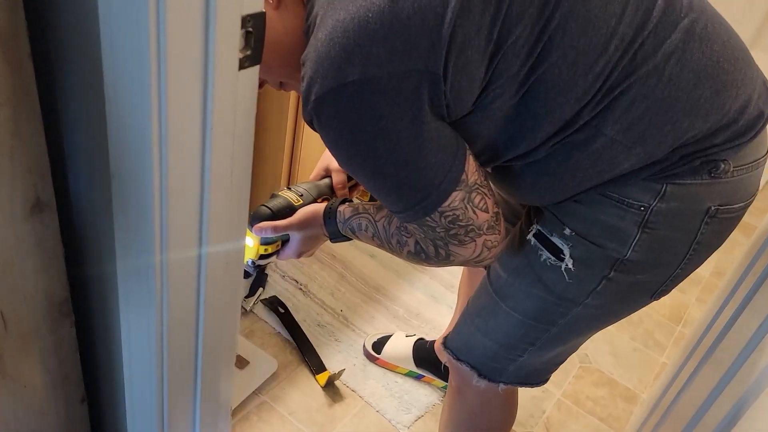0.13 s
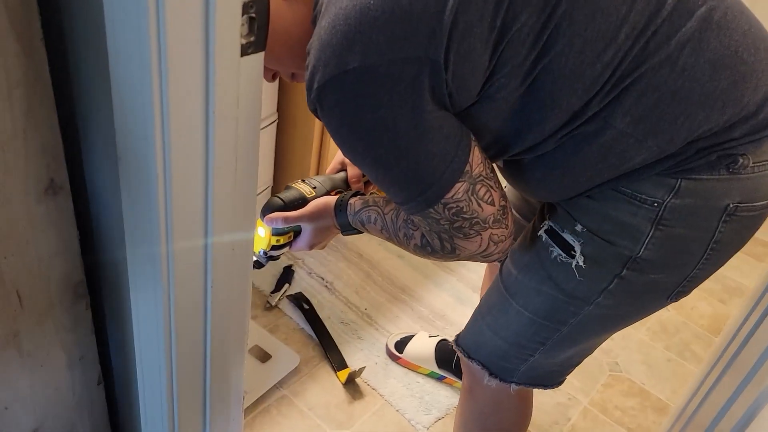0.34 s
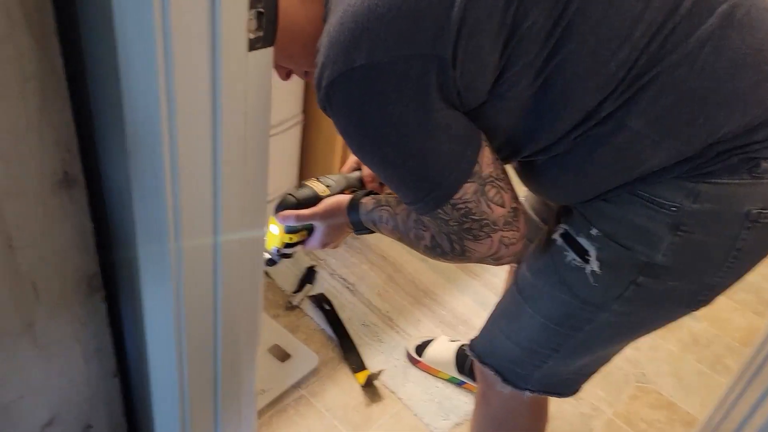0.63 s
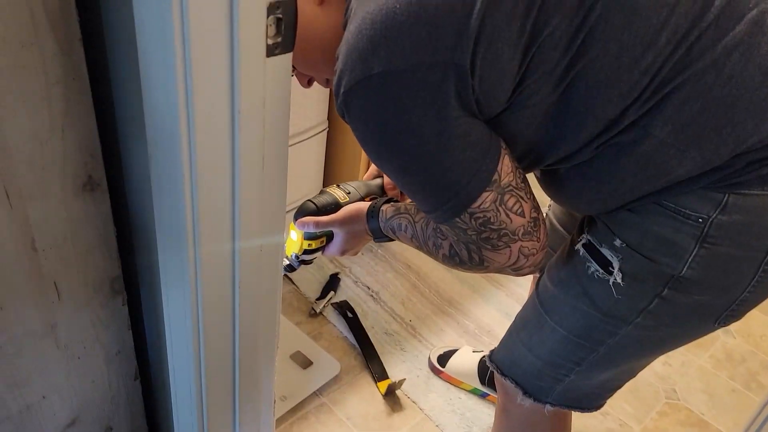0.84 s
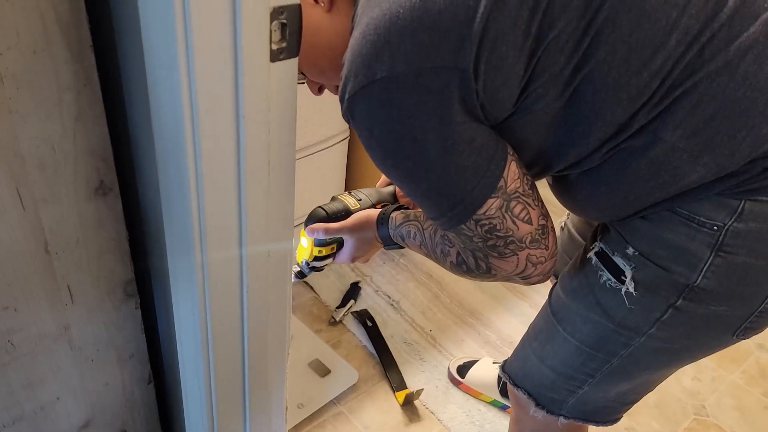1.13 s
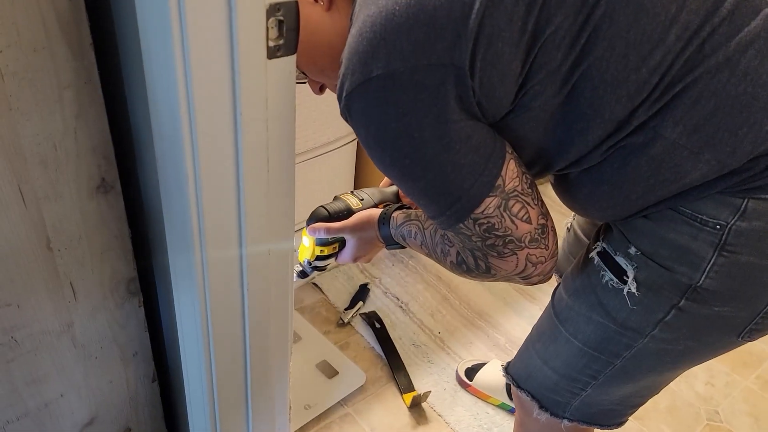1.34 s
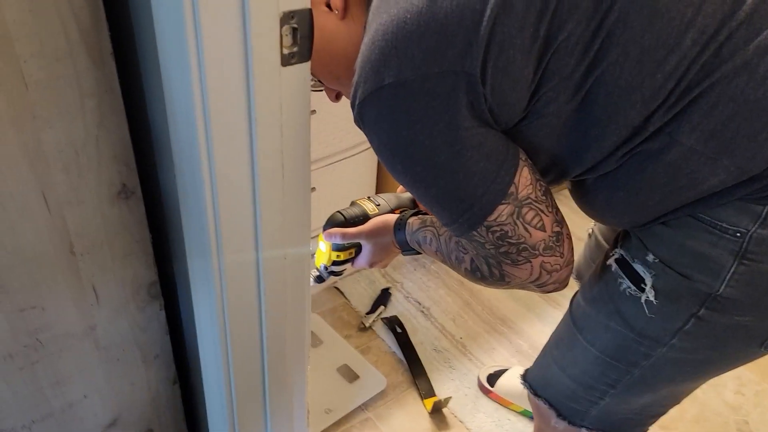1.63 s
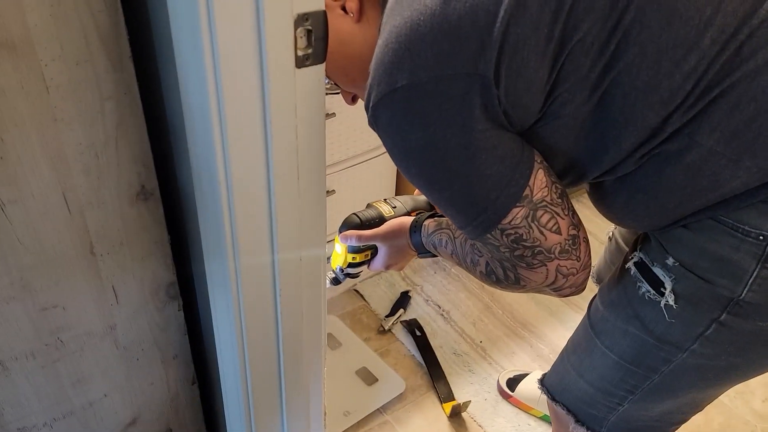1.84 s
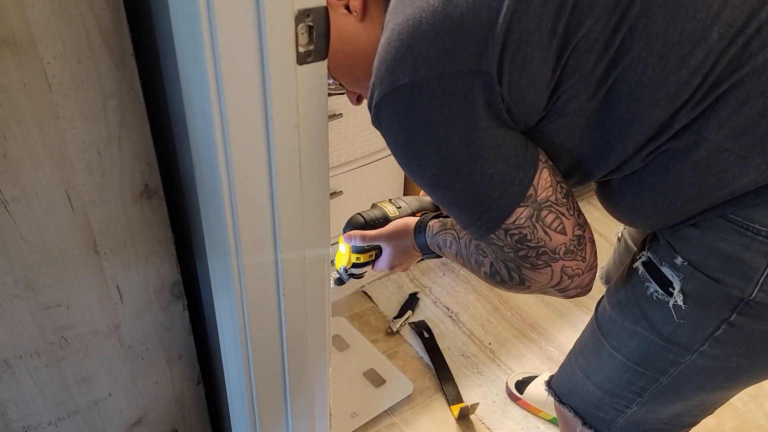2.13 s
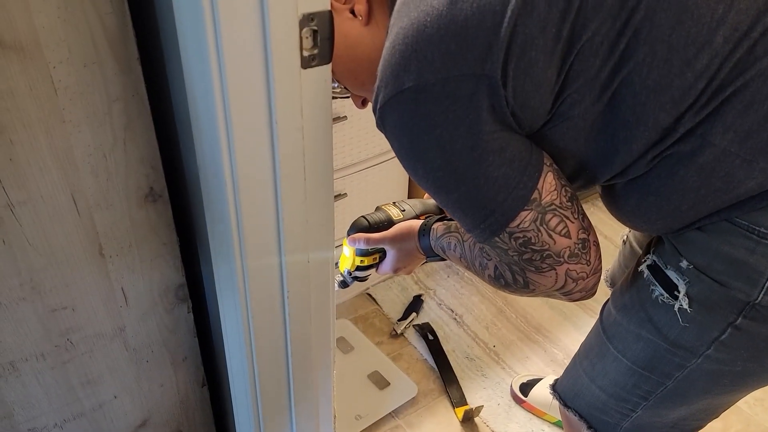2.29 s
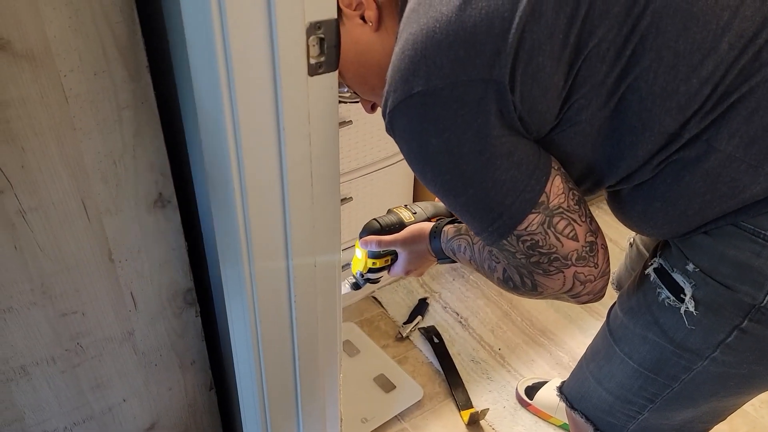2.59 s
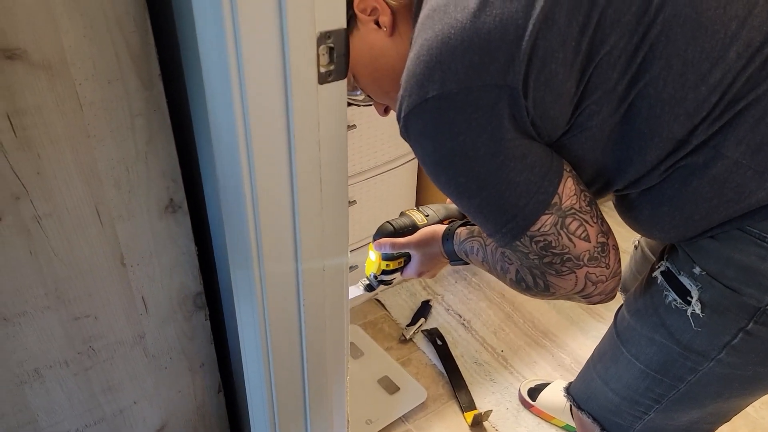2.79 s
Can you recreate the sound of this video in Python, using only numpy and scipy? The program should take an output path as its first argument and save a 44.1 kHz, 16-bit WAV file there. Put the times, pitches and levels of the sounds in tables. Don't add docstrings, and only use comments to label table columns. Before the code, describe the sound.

Close stereo pickup in a small room: a power tool's rough, buzzing drone cuts wood, the pitch rises slightly near the end as hissy scraping takes over, then an abrupt stop and short reverberant tail.

```python
import sys
import numpy as np
from scipy import signal
from scipy.io import wavfile
from scipy.ndimage import uniform_filter1d

SR = 44100
rng = np.random.default_rng(int(sys.argv[2]) if len(sys.argv) > 2 else 0)


def nominal_scale(level):
    x = np.asarray(level, float) / 20
    return 10 ** x


def digitize_waveform(pressure):
    field = np.atleast_2d(pressure).T
    bounded = np.clip(field, -1, 1)
    quanta = np.round(bounded * 32767).astype(np.int16)
    wavfile.write(sys.argv[1], SR, quanta)


N = 130095
T = np.arange(N) / SR

# start_s, swing_hz, level_db, rasp_db
MOTOR_LOAD = [(0, 266.4, -2, 3.5), (.28, 263, 0.5, 3), (.4, 263.9, 0.5, 3.5), (.6, 264.3, -0.5, 2.5),
              (.94, 264.2, 0.5, 2.5), (1.14, 262.3, 1, 5.5), (1.2, 261.4, 2, 6), (1.3, 262.1, 0, 5),
              (1.55, 263.9, 0.5, 6), (1.8, 265, 1.5, 5), (1.97, 261.7, 3.5, 5), (2.07, 265.5, 2, 7),
              (2.2, 266.8, -1, 8), (2.34, 269.4, 0, 10), (2.47, 276.3, 0.5, 8.5), (2.62, 277.4, -4, 9.5),
              (2.72, 277.7, -3, 10), (2.95, 277.6, -8, 11)]
LIFT_S, LIFT_FADE_S = 2.791, 0.04
STOP_S, STOP_FADE_S = 2.853, 0.015
PATCH_DB = 3


def evened(x):
    return x / np.sqrt(np.mean(x ** 2, axis=-1, keepdims=True) + 1e-20)


def read(points, hz):
    point_hz, value = np.transpose(points)
    return np.interp(np.log(hz + 1), np.log(point_hz + 1), value)


def controls(rows):
    start_s, *columns = np.transpose(rows)
    return [np.interp(T, start_s, column) for column in columns]


def drift(top_hz, count):
    coarse_s = np.arange(0, N + 128, 128) / SR
    hz = np.geomspace(0.3, 1, 24) ** 3 * top_hz
    start_turns = rng.random((count, 1, 24))
    waves = np.sin(2 * np.pi * (hz * coarse_s[:, None] + start_turns)) @ hz ** -0.3
    return np.array([np.interp(T, coarse_s, wave) for wave in evened(waves)])


def release(at_s, fade_s):
    return np.exp(-np.maximum(T - at_s, 0) / fade_s)


def opening():
    open_s, rise_s = 2.03, 0.045
    return np.clip((T - open_s) / rise_s, 0, 1)


def swing():
    wobble_hz = 0.35
    swing_hz = controls(MOTOR_LOAD)[0] + wobble_hz * drift(25, count=1)[0]
    return 2 * np.pi * np.cumsum(swing_hz) / SR


def blade(phase):
    # start_s, looseness in the cut, tilt, depth (each -1..1)
    grip = [(0.05, 0.33, 0.46, -0.88), (0.25, 0.28, -0.29, -0.85), (0.42, 0.067, 0.53, -0.019),
            (0.6, -0.42, 0.43, 0.52), (0.8, -0.31, 0.59, 0.12), (1.0, -0.24, 0.11, 0.055),
            (1.12, -0.28, 0.063, 0.14), (1.2, -0.14, -0.44, -0.2), (1.45, -0.084, -0.55, -0.038),
            (1.7, -0.24, -0.75, -0.034), (1.82, 0.045, -0.52, 0.056), (1.95, 0.17, -0.91, 0.13),
            (2.1, 0.49, 0.4, 0.47), (2.2, 0.5, 0.28, 0.22), (2.33, 0.78, -0.08, 0.15),
            (2.45, 0.73, -0.02, 0.045), (2.55, 0.84, 0.52, 0.19), (2.7, 0.51, 0.31, 0.3)]
    # multiple of swing rate, level_db, db_per_looseness, db_per_tilt, left_right_db
    orders = [(1.0, -34.8, -1.3, 1.1, 6.7), (2.0, -38.3, 10.2, 0.2, 0.5), (3.0, -34.1, 1.7, 3.7, 2.1),
              (4.0, -35.7, 4.2, 0.8, 1.7), (5.0, -33.5, -2.6, -2.0, 3.4), (6.0, -37.2, -1.3, 6.8, 5.0),
              (7.0, -35.0, -1.7, -4.1, -1.1), (8.0, -37.6, -3.4, 1.5, -0.6), (9.0, -39.6, -0.7, 0.4, -3.9),
              (10.0, -37.1, -3.1, -2.6, -3.7), (11.0, -38.5, 1.0, 0.8, -1.8),
              (12.0, -34.8, 4.7, -2.5, -5.4), (13.0, -32.0, -5.6, 1.7, -9.2),
              (14.0, -36.6, 1.8, -1.4, -16.6), (15.0, -40.4, 1.8, -2.5, -3.6),
              (16.0, -41.3, 0.6, -0.5, -11.6), (17.0, -42.4, -4.5, -2.0, -11.5),
              (18.0, -40.3, -6.2, 0.4, -7.6), (19.0, -44.7, -3.1, 0.8, -10.5),
              (20.0, -42.8, -7.3, -1.0, -4.6), (21.0, -40.9, -9.0, -0.4, -0.8),
              (22.0, -39.4, -10.7, 0.8, -6.7), (23.0, -39.7, -10.7, 0.6, -24.4),
              (24.0, -37.9, -1.3, 1.4, -6.2)]
    # pitch_hz, level_db
    upper_levels = [(6500, -38), (7200, -52), (8500, -54), (9300, -49), (10300, -56.5), (12500, -61),
                    (15700, -64)]
    port_leads = [(1, -0.4, 0.5, 0.0, 0.0), (2, -2.7, -4.0, -2.0, 1.5), (3, 1.6, -2.5, 0.0, -3.5),
                  (4, -1.4, 0.0, 0.5, -1.5), (5, -3.4, 0, 0, 0), (6, -2.2, 0.0, 0.0, 1.0),
                  (7, -0.8, 1.0, -1.0, -1.5), (8, -0.1, -0.5, -1.0, -2.0), (9, 1.2, 0.5, -1.0, -5.0),
                  (10, 2.6, 1.5, -1.0, 1.0), (11, -2.2, 0.0, -1.5, 2.0), (12, -3.1, 1.5, -2.0, -1.0),
                  (13, 2.9, 0.5, -0.5, 0.0), (14, -1.5, -1.5, 0.0, -3.5), (15, 2, 1.5, -0.5, 0.5),
                  (16, -1, 1, 3.5, 4), (17, -0.8, -2.5, 2.5, -0.5), (18, 2.3, 0.5, -1, -1.5),
                  (19, -2.5, 0, 1, -0.5), (20, 0.3, 2.5, 0.5, -2), (21, 2, -1, -0.5, 0),
                  (22, 0.3, -5, -2.5, -2), (23, 0, -0.5, 0, 0), (24, -1.1, -1.5, -0.5, -1.5)]
    wander_db, own_db, sway_rad = 1.2, 0.9, 0.2

    level_db = controls(MOTOR_LOAD)[1]
    loose, tilt, depth = controls(grip)
    opened = opening()
    base_hz = MOTOR_LOAD[0][1]
    upper = []
    for k in np.arange(len(orders) + 1, len(orders) + 34):
        upper.append((k, read(upper_levels, k * base_hz), -6, 0, -7.5))
    shake = (0.004 + 0.04 * opened) * drift(150, count=1)[0]
    unrest = 1 + 0.5 * opened
    fifth_rad = 3.27 * np.clip((0.9 - T) * 3, 0, 1) + 1.9 * opened
    freed_db = -6 * np.clip((T - 2.42) * 10, 0, 1)
    drum_db = 6 * np.maximum(-depth, 0)

    out = np.zeros((2, N))
    for i, (_, db, loose_db, tilt_db, pan_db) in enumerate(list(orders) + upper):
        order = i + 1
        both, left, right, sway = drift(20, count=4) * np.clip(i / 9, 0.3, 2.6) * unrest
        turn = order * (phase + shake) + 2 * np.pi * rng.random()
        db = db + loose_db * loose + tilt_db * tilt + wander_db * both
        if order in (2, 5):
            db = db + drum_db
        if order == 1:
            db = db + freed_db

        if i < len(port_leads):
            _, lead, per_loose, per_tilt, per_depth = port_leads[i]
            lead = lead + per_loose * loose + per_tilt * tilt + per_depth * depth
        else:
            lead = 2 * 2.25 * rng.random()
        lead = lead + sway_rad * sway
        if order == 5:
            lead = lead + fifth_rad

        left_flare_db, right_flare_db = flares(order)
        share = 1 / (1 + nominal_scale(-pan_db) ** 2)
        left_level = np.sqrt(4 * share) * nominal_scale(db + own_db * left + left_flare_db)
        right_level = np.sqrt(4 - 4 * share) * nominal_scale(db + own_db * right + right_flare_db)
        out[0] += left_level * np.cos(turn + lead)
        out[1] += right_level * np.cos(turn)
    return out * nominal_scale(level_db) * release(LIFT_S, LIFT_FADE_S)


def flares(order):
    # peak_s, multiple of swing rate, spread_s, left_db, right_db
    swells = [(0.09, 14, 0.05, -0.7, -10.5), (0.09, 25, 0.05, -9.4, -8.6), (0.16, 6, 0.12, 2.7, -9.7),
              (0.22, 10, 0.08, -9.6, 2.6), (0.25, 16, 0.12, -5.6, -5.3), (0.25, 23, 0.05, 4.4, 8.1),
              (0.33, 4, 0.18, -9.8, -2.1), (0.33, 12, 0.27, -5.3, 1.1), (0.35, 9, 0.08, -7.5, -5.5),
              (0.38, 2, 0.27, 3.7, -4.7), (0.43, 7, 0.18, -9.5, 1.9), (0.52, 23, 0.05, 7.4, 6.1),
              (0.53, 3, 0.18, 3.7, -8.2), (0.58, 14, 0.12, 5.0, 6.1), (0.71, 20, 0.08, 5.1, -10.6),
              (0.86, 23, 0.1, 5, 5), (0.95, 27, 0.18, 6.1, 7.1), (0.97, 25, 0.4, -5.5, -7.5),
              (1.05, 14, 0.18, 0.8, -6.8), (1.1, 10, 0.12, -7.0, -8.1), (1.19, 35, 0.27, -2.3, -8.1),
              (1.32, 4, 0.27, 4.8, -2.1), (1.5, 5, 0.4, 2.5, -4), (1.64, 10, 0.08, 4.7, 7.2),
              (1.75, 36, 0.3, 7, 8), (1.8, 3, 0.18, -5.7, 4.1), (1.8, 34, 0.25, 8, 9),
              (2.12, 2, 0.08, -10.3, -3.0), (2.16, 12, 0.08, 7.5, 3.9), (2.2, 11, 0.08, -9.5, -5.2),
              (2.24, 8, 0.05, 8.6, 6.6), (2.45, 12, 0.05, -5.5, -8.9), (2.53, 3, 0.06, 4, 4),
              (2.64, 4, 0.08, 0.7, 8.9), (2.68, 12, 0.08, 4.8, 11.3), (2.72, 5, 0.04, 7, 7)]
    out = np.zeros((2, N))
    for peak_s, multiple, spread_s, left_db, right_db in swells:
        if round(multiple) == order:
            bell = np.exp(-0.5 * ((T - peak_s) / spread_s) ** 2)
            out += np.outer([left_db, right_db], bell)
    return out


def rasp(phase):
    # pitch_hz, level_db (per Hz)
    wood_colour = [(30, -54), (150, 1), (400, -19), (1000, -2.5), (3000, 0.5), (6200, 2), (7500, -6),
                   (15700, -12.5)]
    # pitch_hz, level_db (per Hz)
    open_colour = [(30, -37), (150, -27), (400, -21), (1000, -15), (3300, 0.5), (6200, 1), (10000, -4),
                   (15700, -9)]
    gate, sing_hz, sing_db = 0.3, 15300, -51

    rasp_db = controls(MOTOR_LOAD)[2]
    opened = opening()
    strokes = 1 + gate * np.cos(2 * phase) + 0.5 * gate * np.cos(phase)
    buried = nominal_scale(-42.8) * hiss(wood_colour, PATCH_DB)
    freed = nominal_scale(-37.5) * hiss(open_colour, patch_db=2.2)
    noise = (1 - opened) * buried + opened * freed

    slow = signal.lfilter([1], [1, -0.992], rng.standard_normal((2, N)))
    sing_turn = 2 * np.pi * sing_hz * T
    sing = evened(slow[0] * np.cos(sing_turn) + slow[1] * np.sin(sing_turn))
    sing = nominal_scale(sing_db) * opened * sing * nominal_scale([[-4], [3]])
    return (nominal_scale(rasp_db) * noise * strokes + sing) * release(STOP_S, STOP_FADE_S)


def hiss(colour, patch_db):
    # pitch_hz, left_right_db
    balance = [(40, 18), (290, 1.5), (1400, 4.5), (3100, -10), (15000, -6)]
    # pitch_hz, correlation (-1..1)
    likeness = [(100, 1), (1000, 0.15), (4000, -0.19)]
    frames, hz = N // 128 + 5, np.fft.rfftfreq(512, 1 / SR)
    a, b, c, d, patches = rng.standard_normal((frames, 257, 5)).T
    patches = uniform_filter1d(uniform_filter1d(patches, 5, 0), 14, 1)
    patches = evened(patches)
    same = np.clip(read(likeness, hz), -1, 1)[:, None]
    left, other = a + 1j * b, c + 1j * d
    spectrum = np.array([left, same * left + np.sqrt(1 - same ** 2) * other])
    pan_db = read(balance, hz)[:, None] / 2
    colour_db = read(colour, hz)[:, None]
    spectrum *= nominal_scale(colour_db + patch_db * patches + np.array([pan_db, -pan_db]))
    x = signal.istft(spectrum, nperseg=512, noverlap=384)[1][:, :N]
    return x / x.std()


def shudder():
    # pitch_hz, level_db (per Hz)
    buzz_colour = [(150, -40), (270, -12.5), (420, -23.5), (1000, -14), (3000, -30)]
    rise = np.clip((T - LIFT_S) / 0.043, 0, 1)
    return nominal_scale(-38.5) * hiss(buzz_colour, PATCH_DB) * rise * release(STOP_S, 2 * STOP_FADE_S)


def knocks():
    # peak_s, level_db
    hits = [
        (0.736, -46),
        (0.971, -46),
        (1.108, -39),
        (1.375, -42),
        (1.561, -41),
        (1.69, -35),
        (1.784, -34),
        (2.599, -42),
    ]
    knock_hz, spread_s, trim_db = 91, 0.0049, -6
    out = np.zeros(N)
    for peak_s, level_db in hits:
        since = T - peak_s
        bell = np.exp(-np.clip(since / spread_s, -9, 9) ** 2 / 2)
        out += nominal_scale(level_db + trim_db) * bell * np.sin(2 * np.pi * knock_hz * since + 1)
    return out * nominal_scale([[3], [-9]])


def room(x):
    # pitch_hz, t60_s
    decay = [(200, 1), (3000, 0.65), (15000, 0.08)]
    taps = np.zeros((2, 20000))
    at = np.arange(200, 19980, 20) + rng.integers(0, 20, (2, 989))
    np.put_along_axis(taps, at, rng.choice([-1., 1.], at.shape), 1)
    hz, t, spectrum = signal.stft(taps, SR, nperseg=256)
    fall = nominal_scale(-60 * t / read(decay, hz)[:, None])
    tail = signal.istft(spectrum * fall, SR, nperseg=256)[1]
    return signal.fftconvolve(x, tail / np.linalg.norm(tail[0]), axes=1)[:, :N]


def scene():
    phase = swing()
    tone = blade(phase)
    scrape = rasp(phase) + shudder()
    room_send = nominal_scale(-4) * scrape + nominal_scale(-20) * tone
    return tone + scrape + knocks() + room(room_send)


def low_pass(x):
    return signal.sosfilt(signal.butter(12, 15860, fs=SR, output="sos"), x)


def record(dry):
    return low_pass(dry)


dry = scene()
out = record(dry)
digitize_waveform(out)
```